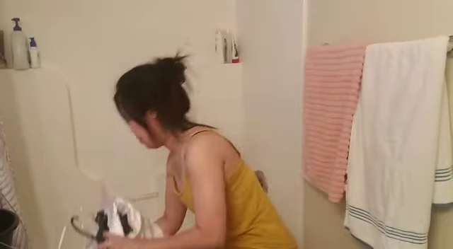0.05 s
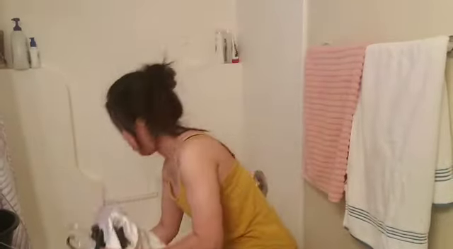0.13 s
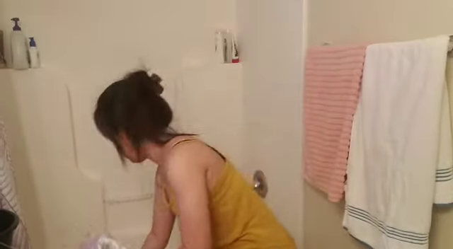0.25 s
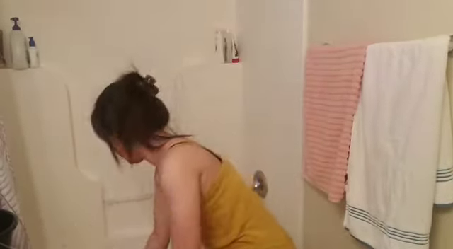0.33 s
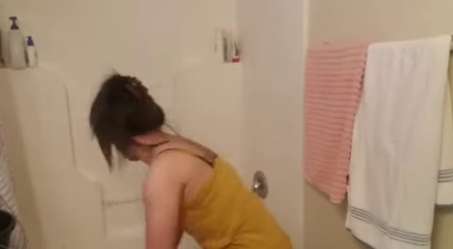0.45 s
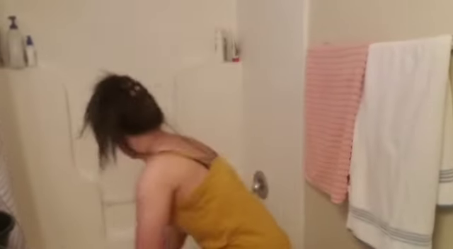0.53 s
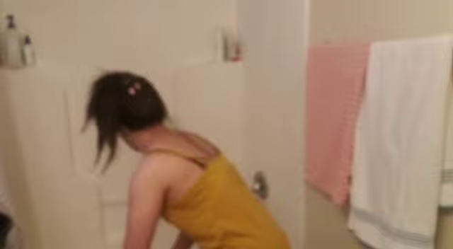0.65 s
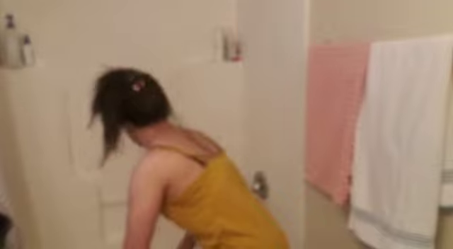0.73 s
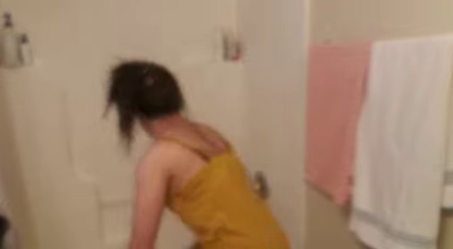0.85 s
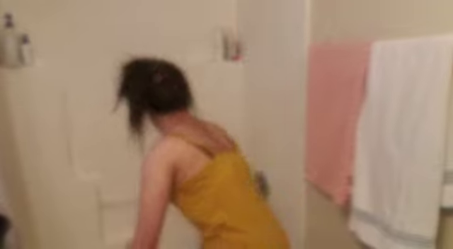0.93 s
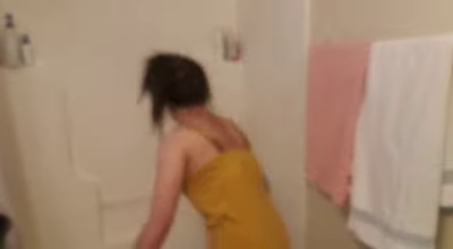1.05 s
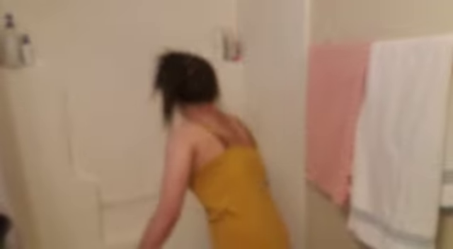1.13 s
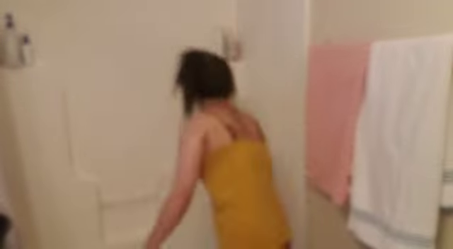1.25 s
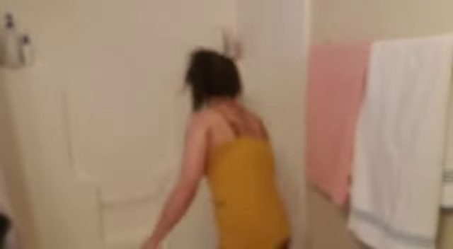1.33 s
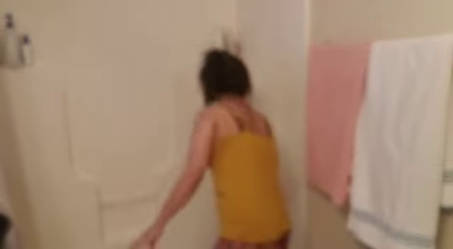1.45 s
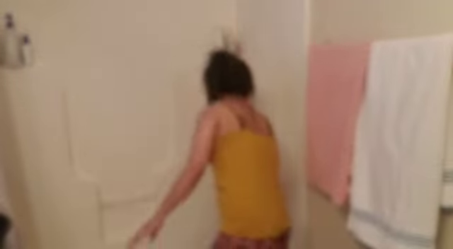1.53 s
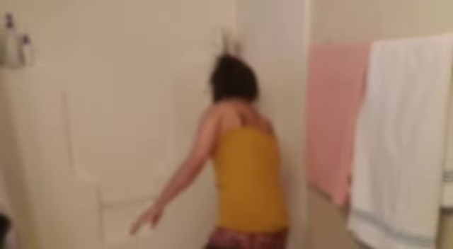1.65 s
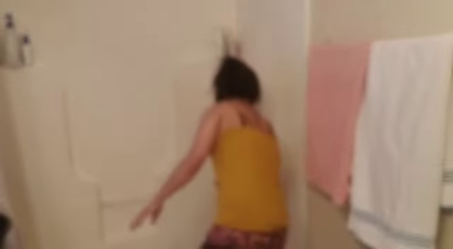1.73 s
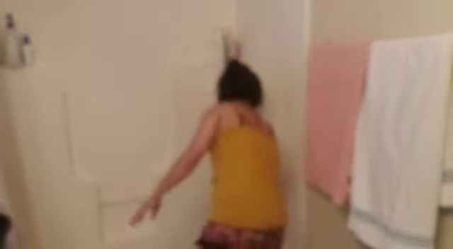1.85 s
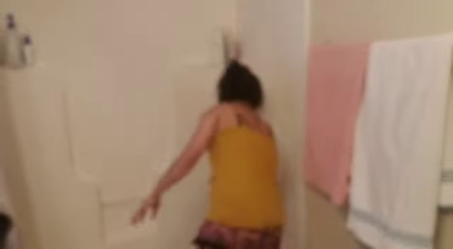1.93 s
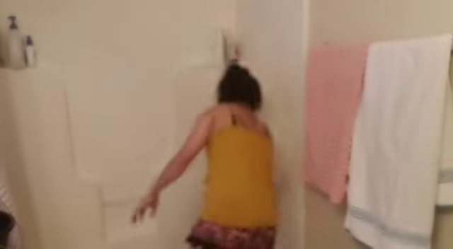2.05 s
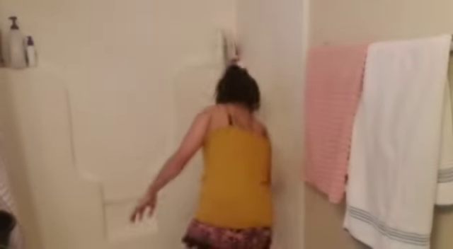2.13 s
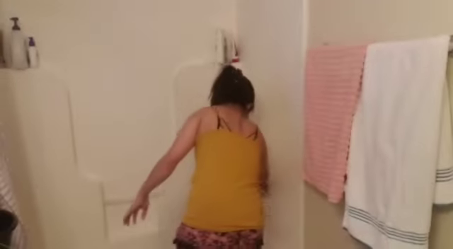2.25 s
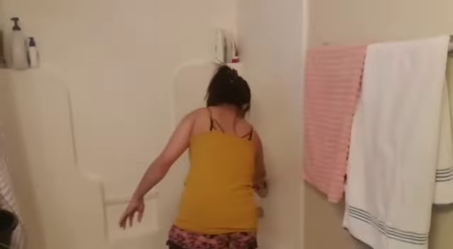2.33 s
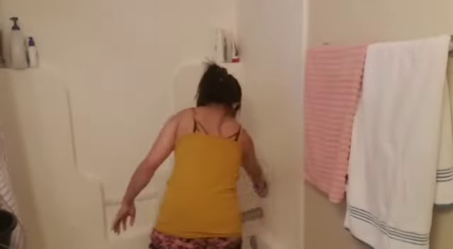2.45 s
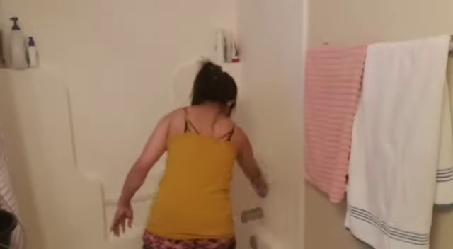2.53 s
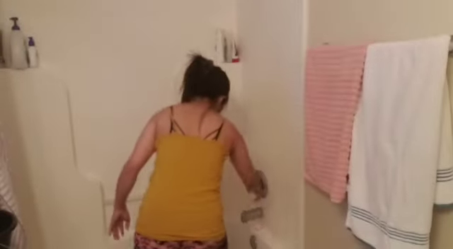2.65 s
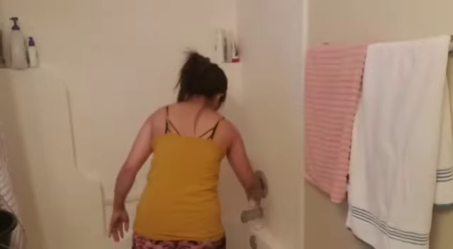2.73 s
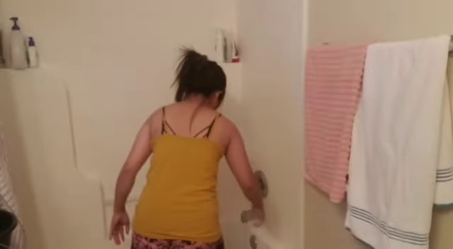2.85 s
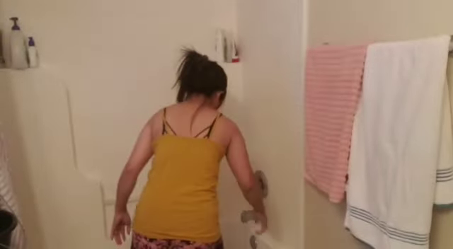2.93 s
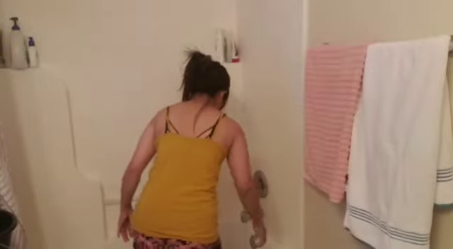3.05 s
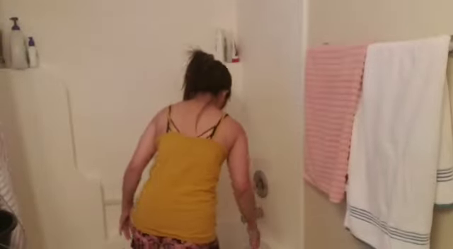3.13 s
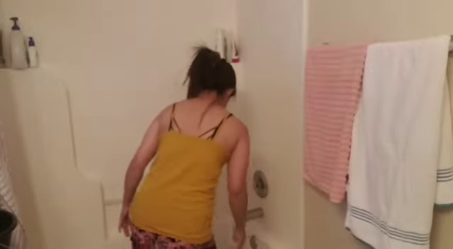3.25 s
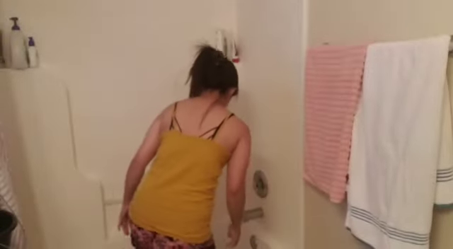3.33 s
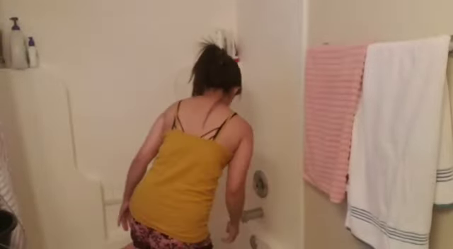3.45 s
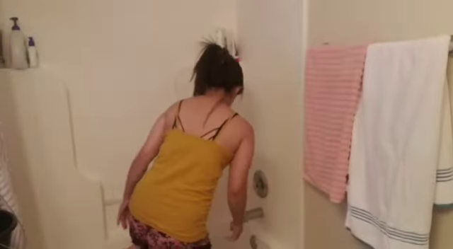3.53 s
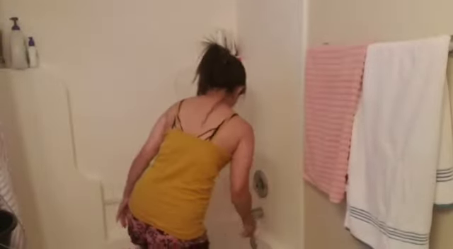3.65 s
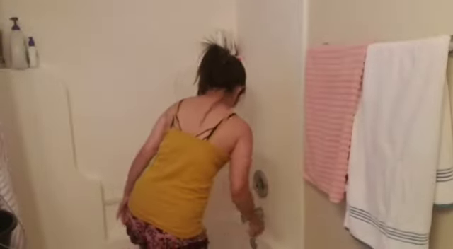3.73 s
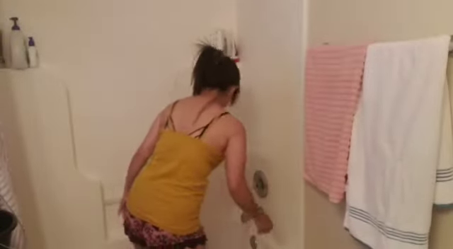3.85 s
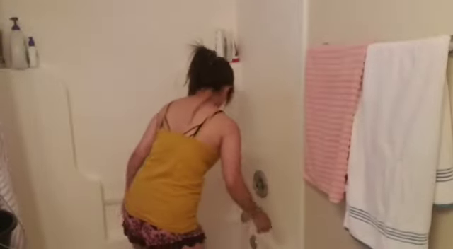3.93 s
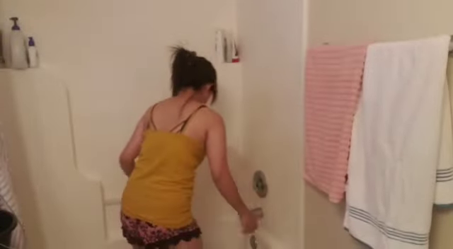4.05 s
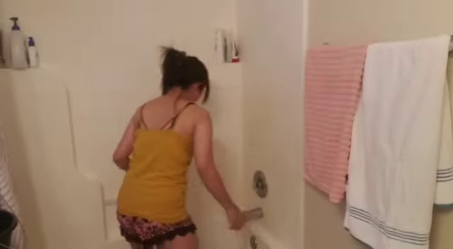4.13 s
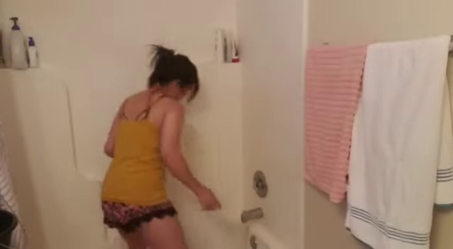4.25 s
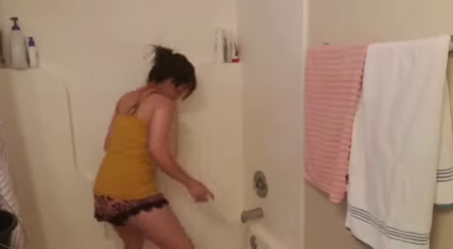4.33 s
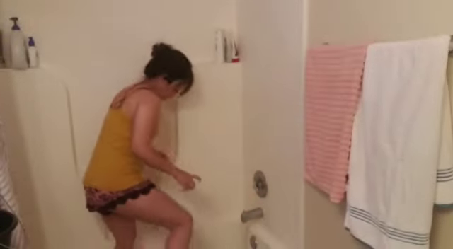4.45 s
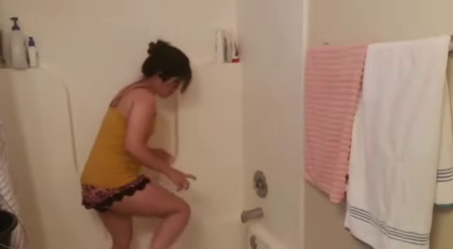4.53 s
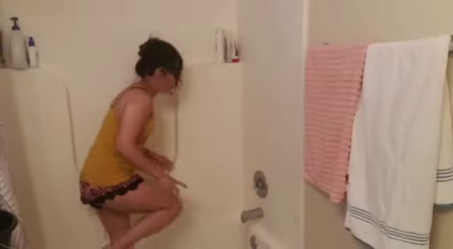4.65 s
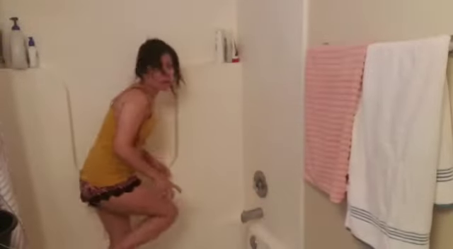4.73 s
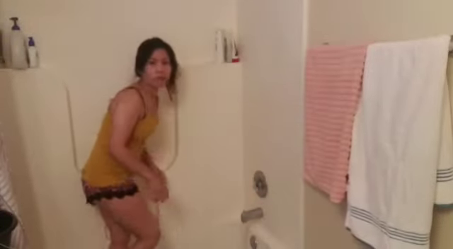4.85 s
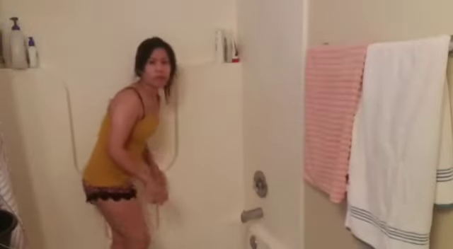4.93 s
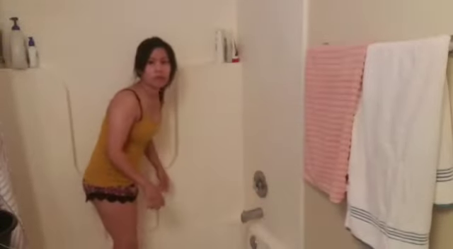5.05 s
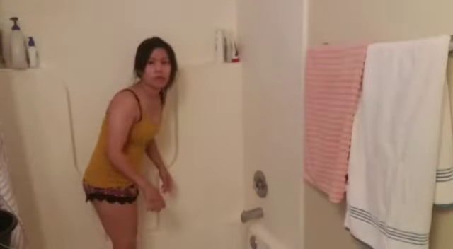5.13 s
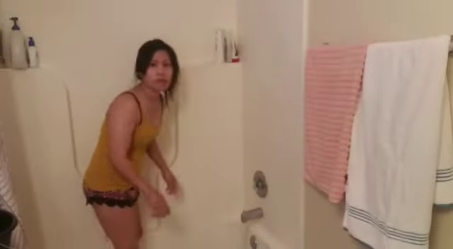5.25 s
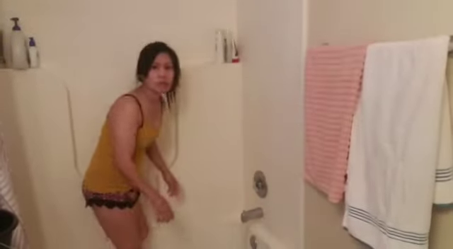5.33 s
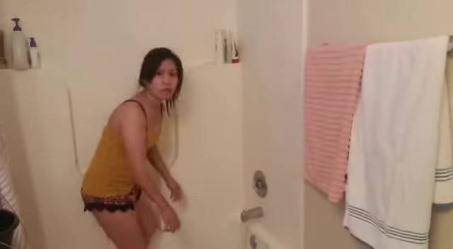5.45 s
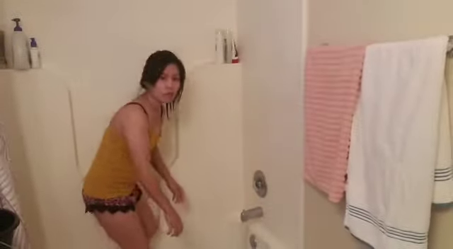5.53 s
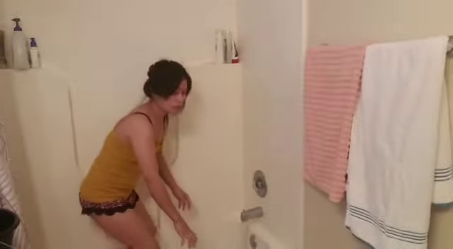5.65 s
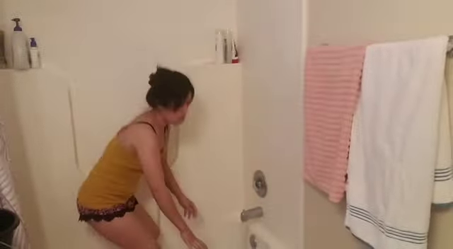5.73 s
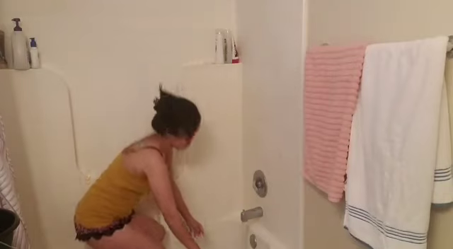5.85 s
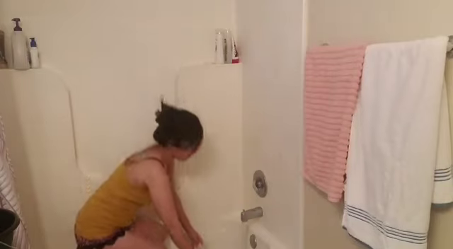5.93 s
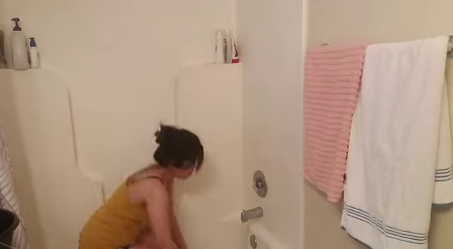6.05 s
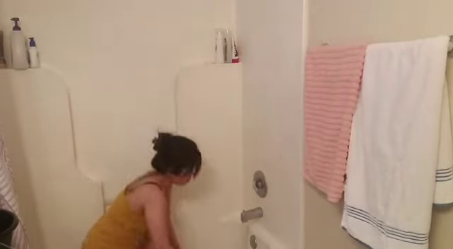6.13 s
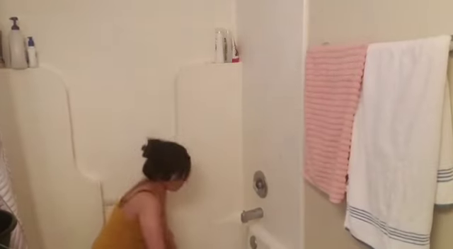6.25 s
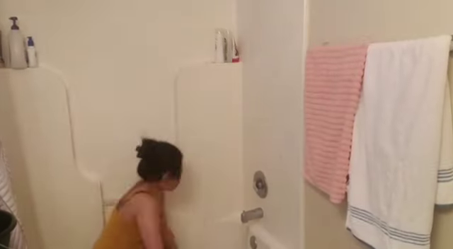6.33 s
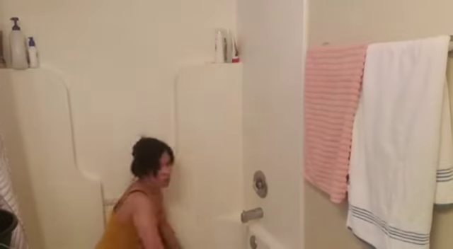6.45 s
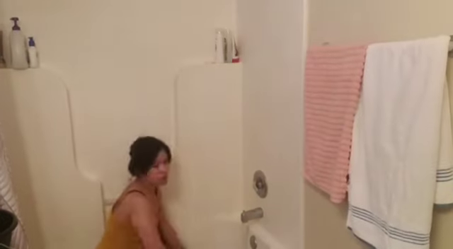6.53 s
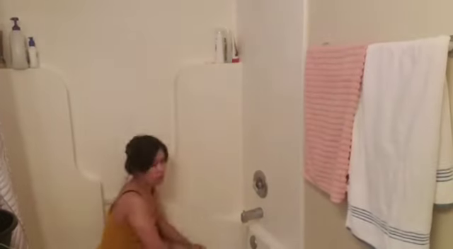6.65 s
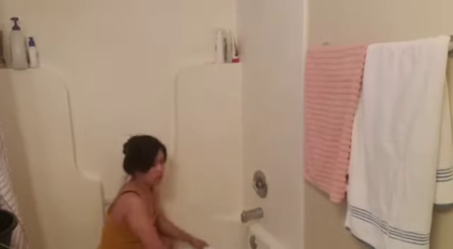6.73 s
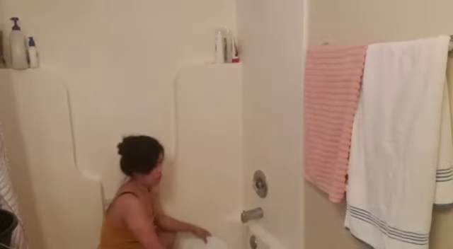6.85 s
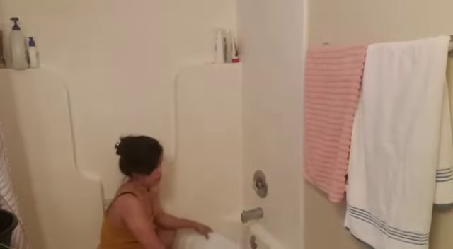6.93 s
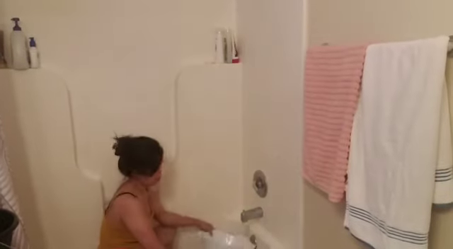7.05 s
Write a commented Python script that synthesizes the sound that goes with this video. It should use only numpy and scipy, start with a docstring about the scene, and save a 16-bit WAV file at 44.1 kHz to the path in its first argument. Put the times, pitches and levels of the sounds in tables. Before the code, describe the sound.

In a small hard-walled bathroom, a plastic-sounding hanger rattles, feet thump softly, and a tap coughs before pouring a bright, continuous stream.

```python
"""A bathroom: a fan hums (wavering tones over noise), cloth brushes the tub (shaped grains), a hanger
clatters onto its rim (clicks and rattles driving modes), and feet thump its floor (decaying low tones).
The tap squeals and coughs air in spurts, then a steady jet of noise patches and bubbles splashes in
and makes the tub's shell drum. Hard walls answer as decaying diffuse noise.
The two microphone ports hear the treble differently."""
import sys
import numpy as np
from scipy import signal
from scipy.fft import rfft, irfft, next_fast_len
from scipy.io import wavfile
from scipy.ndimage import uniform_filter1d, map_coordinates

SR = 44100
rng = np.random.default_rng(int(sys.argv[2]) if len(sys.argv) > 2 else 0)


def transcribe(u):
    """Save the signal u as a 16-bit wav file named by the first command-line argument.

    u: samples, shape (n,) or (channels, n), limited to [-1, 1]; the rate is SR.
    q: integer samples, one column per channel.
    """
    v = np.clip(np.atleast_2d(u).T, -1, 1)
    q = np.round(v * 32767).astype(np.int16)
    wavfile.write(sys.argv[1], SR, q)


N = 313110

# Levels are relative; each source adds its own gain.
# Fan hum. Each row: frequency in Hz, level in dB.
FAN_TONES = [(58.5, -51), (236.9, -69)]
# Spectrum of the fan's rumble. Each row: frequency in Hz, relative density in dB.
RUMBLE_SPECTRUM = [(15, -43), (30, -4), (45, -7.5), (80, -15), (110, 3), (135, -7), (240, -10),
                   (290, -13.5), (600, -19.5), (1000, -25), (1250, -39), (2000, -58), (3300, -120)]
# Brushes of cloth and skin. Each row: time of the peak in seconds, level in dB, rise and fall in dB per second.
BRUSHES = [(0.122, -63, 20, 100), (0.442, -43.5, 350, 3000), (0.7, -63, 299, 50), (0.723, -44, 1500.5, 154),
           (0.76, -44, 302, 401), (0.8, -69, 300, 202), (1.06, -72.5, 300, 37), (1.43, -70, 82.5, 600),
           (1.885, -66, 1500, 130)]
# Spectrum of the brushing. Each row: frequency in Hz, relative density in dB.
CLOTH_SPECTRUM = [(210, -36.5), (350, -7), (802, -9), (881, -2), (1110, -10.5), (1240, -7), (2110, -7.5),
                  (2590, -11), (4410, -8), (14700, -20.5)]
# Hanger contacts. Each row: start in seconds, click level in dB, rattle level in dB, rattle rise in seconds,
# rattle 60 dB decay in seconds, ringing level in dB, dullness in dB per octave, bass corner in Hz.
CONTACTS = [(0.1653, -35.5, -36.5, .002, 0.58, -20, 6.5, 2200),
            (0.2302, -25.5, -29, 0.0022, 0.25, -7.5, 2, 2600), (0.4515, -10, -18, 0.007, 0.26, 0, 1, 250)]
# Hanger modes. Each row: frequency in Hz, level in dB, nominal decay in seconds.
HANGER_MODES = [(351, 2, 1.5), (820, -8, 0.48), (1366, -4, 0.61), (1553, 1, 0.22), (1614, -5, .16),
                (1710, 4.5, 0.2), (2660, -9.5, 0.15), (3270, -21, 0.121), (3410, -9.5, 0.081),
                (4400, -8, 0.05), (5700, -18, 0.32), (6400, -5.5, 0.34), (7920, -10, 0.14),
                (9300, -30, 0.22), (9900, -19, 0.2), (12000, -11, 0.12)]
# Spectrum of a contact. Each row: frequency in Hz, relative level in dB.
CONTACT_SPECTRUM = [(150, -43.5), (250, 3.5), (340, -11), (1060, -13), (1750, -13), (2030, -14),
                    (3340, -7.5), (14700, -9)]
# Thumps on the tub and in the pipe. Each row: start in seconds, level in dB, frequency in Hz,
# 60 dB decay in seconds.
THUMPS = [(0.367, -44, 300, 0.18), (0.387, -42, 245, 0.11), (0.39, -40.5, 107.4, 0.25),
          (2.052, -41.5, 156, 0.39), (2.081, -33.5, 113.4, 0.17), (2.309, -40.5, 112.8, 0.45),
          (2.65, -36, 201, .13), (3.034, -37, 45, 0.14), (4.313, -30, 50.3, 0.36), (5.599, -46, 409, 0.77),
          (6.127, -30.5, 62.3, .16), (6.23, -38, 166, 0.094), (6.41, -34.5, 136, .18)]
# Faint narrow chirrs before the stream. Each row: start in seconds, level in dB, centre in Hz,
# time to the peak in seconds, width as a share of the centre.
CHIRRS = [(1.05, -55, 3560, .015, 0.11), (1.05, -55, 7660, .015, 0.076), (1.875, -50, 3600, 0.024, 0.12),
          (1.885, -63, 5000, 0.028, 0.11), (2.165, -45, 1140, 0.015, 0.12), (2.376, -33, 1800, 0.009, .3)]
# Jerks of the opening tap. Each row: start in seconds, rise in seconds, spray level in dB, fizz level in dB,
# spray sag and fizz sag in dB per second.
SPURTS = [(2.045, 0.0055, -50.5, -53.5, 167, 200), (2.12, 0.032, -56.5, -62, 62, 60),
          (2.264, 0.0125, -47.5, -46.5, 40, 103), (2.463, 0.04, -35.5, -42.5, 30, 13),
          (2.728, .012, -32, -37, 102, 61), (2.775, .014, -30.5, -34, 0, 0)]
SHUT_DB = -73.5  # level from which the first spurt rises
# Wavering of the full stream. Each row: time in seconds, spray level in dB.
STREAM = [(2.82, -34.5), (2.84, -29), (3.13, -33), (3.16, -29.5), (3.28, -33.5), (3.39, -30), (3.9, -32.5),
          (3.95, -29), (4.12, -32), (4.14, -28), (4.18, -32.5), (4.75, -31.5), (4.8, -26.5), (4.83, -30),
          (4.91, -27.5), (4.94, -33.5), (5.2, -26), (5.24, -31), (5.25, -28), (5.39, -33.5), (5.44, -28.5),
          (5.58, -33.5), (5.67, -29.5), (5.87, -31.5), (6.36, -29), (6.44, -34.5), (6.46, -30.5),
          (7.1, -31)]
FIZZ_DB, FIZZ_FOLLOWS = -35, 0.3  # mean of the full stream's listed fizz levels; share of the spray's swings
# Spits of fine spray. Each row: time of the peak in seconds, lift of the fizz in dB,
# distance in seconds at which the lift is 1/e.
SPITS = [(2.874, 2.5, .04), (3.18, 2.5, .03), (3.833, 6, 0.027), (4.585, 3.5, .025), (4.819, 1, .025),
         (4.9, 1, .02), (5.156, 3.5, .05), (5.64, 1.5, .04), (6.211, 2, 0.024), (6.849, 3, .04)]
# Pool and shell under the jet. Each row: time in seconds, gurgle level in dB, drumming level in dB.
POOL = [(2.03, -89, -68), (2.062, -56, -44), (2.134, -75, -62), (2.41, -45.5, -50), (2.454, -47.5, -48),
        (2.506, -36.5, -45), (2.6, -42, -45), (3.2, -41, -47), (3.33, -40, -44), (3.6, -41.5, -43.5),
        (4.05, -42, -44.5), (4.2, -40, -44.5), (4.45, -40, -44.5), (5.05, -40, -44.5), (5.5, -41, -44),
        (6.4, -41.5, -43.5), (6.9, -38.5, -42), (7.1, -40, -44.5)]
GURGLE_SWING_DB, DRUM_SWING_DB = 1, 1  # size of the slow chance swells
# Spectra of spray, fine fizz, gurgling and drumming. Each row: frequency in Hz, relative density in dB.
SPRAY_SPECTRUM = [(1060, -39.5), (1800, -12.5), (2870, -5), (3230, -4), (3770, -4.5), (4150, 0.5),
                  (7500, -7), (9750, -37.5), (16500, -120)]
FIZZ_SPECTRUM = [(3820, -18), (6500, -7), (7820, -3.5), (8720, -6.5), (9690, -5), (11000, -8.5),
                 (12100, -5.5), (14000, -7), (14700, -14.5)]
GURGLE_SPECTRUM = [(320, -31), (550, -7.5), (648, -9.5), (709, -2), (985, -3), (1350, 3), (1750, 1),
                   (2500, -5.5), (3250, -28.5), (5500, -120)]
DRUM_SPECTRUM = [(44, -30.5), (75, -4.5), (194, -0.5), (360, -6), (406, -5.5), (449, -8.5), (680, -9),
                 (880, -40.5), (1500, -120)]
# Lumps of water slapping the pool. Each row: start in seconds, level in dB, centre in Hz,
# time to the peak in seconds, width as a share of the centre.
SLAPS = [(2.869, -28, 4370, 0.016, 0.23), (3.40, -19, 4300, .012, 0.15), (3.479, -16.5, 3800, 0.011, 0.067),
         (3.689, -15, 4140, 0.01, .15), (3.951, -18.5, 3800, 0.018, 0.13), (4.069, -17, 4280, .012, .15),
         (4.128, -12, 3600, 0.0085, 0.1), (4.378, -16.5, 2430, 0.013, 0.18),
         (4.378, -19, 3320, 0.012, 0.051), (4.485, -13.5, 4340, 0.0046, 0.086),
         (4.595, -19.5, 7560, 0.007, .08), (4.645, -20, 4260, 0.0061, 0.052),
         (4.765, -12.5, 6200, 0.008, 0.093), (4.795, -19, 5230, 0.0099, 0.27),
         (4.895, -18, 4760, 0.011, 0.23), (5.005, -17, 2240, 0.01, 0.068), (5.179, -16, 4060, 0.01, .15),
         (5.25, -13, 4530, 0.0078, 0.18), (5.283, -10.5, 5040, 0.0073, 0.18),
         (5.63, -16, 3500, 0.0039, 0.42), (5.91, -16, 4120, 0.0052, 0.31), (6.285, -16, 4370, .01, .2),
         (6.365, -12, 6540, 0.016, 0.17), (6.565, -14.5, 5300, 0.017, 0.17)]
# Resonances of shell and alcove. Each row: frequency in Hz, width in Hz, left lift in dB, right lift in dB.
SHELL_MODES = [(110.5, 7, 5.5, 4.5), (203.6, 3.9, 4.5, 10.5), (261, 13, -2, 5), (304, 13, 1.5, 4),
               (412.5, 6.3, 10, 10), (729, 31, 5.5, 5), (1204, 50, 2.5, 3), (1370, 13, 3.5, 0),
               (2410, 34, 1.5, -2), (2710, 30, 3, 6), (3289, 26.5, 8, 1.5), (3520, 320, 2.5, 2.5),
               (3810, 36, -10, 11.5), (4190, 50, 2.5, 7), (3880, 80, 1, -13), (4317, 36, -13, 9.5),
               (5090, 60, -12, 6)]
# Squeals of the tap valve. Each row: start in seconds, level in dB, frequency in Hz, length in seconds.
SQUEALS = [(2.379, -37.5, 2450, 0.026), (2.41, -48, 2560, .022)]
# Diffuse field. Each row: frequency in Hz, left-right likeness from 0 to 1.
LIKENESS = [(60, 0.65), (270, 0.98), (440, 0.44), (730, 0.17), (1200, 0.03), (15000, 0.049)]
# Reverberation at damping 1. Each row: frequency in Hz, 60 dB decay in seconds.
WALL_DECAY = [(200, 0.82), (1500, 0.58), (5000, .65), (12000, 0.22)]
# Port colour. Each row: frequency in Hz, left over right in dB.
PORT_BALANCE = [(60, 1), (200, -1), (500, -0.5), (2000, 1.5), (3000, 2.5), (4200, 9.5), (5000, 1.5),
                (6200, 3), (7700, -10.5), (8600, 0.5), (9600, -0.5), (11000, 2), (11900, -18.5),
                (12500, -28), (13000, -37), (13600, -49)]
LAG_S, TOP_HZ = 4 / 44100, 14650  # delay of the left port; upper band limit
# Spectrum of the self-noise. Each row: frequency in Hz, relative density in dB.
HISS_SPECTRUM = [(650, -30.5), (1100, -2.5), (2000, -4), (2900, -5.5), (3600, -1), (4600, -7), (6500, -3.5),
                 (7600, -3), (8600, -5), (14700, -8.5)]


def amp(db):
    """Level is logarithmic: decibels to gain."""
    return 10 ** (np.asarray(db) / 20)


def unit(x):
    """Mean power sets level: a signal is scaled to rms 1."""
    return x / np.sqrt(np.mean(x ** 2) + 1e-20)


def along(points, hz):
    """Spectra are drawn over log frequency: (Hz, value) points are joined by lines."""
    f, v = np.transpose(points)
    return np.interp(np.log(hz + 1), np.log(f + 1), v)


def curves(rows):
    """An envelope is linear in dB between points: one curve per column after time, near silence before."""
    seconds, *columns = np.transpose(rows)
    return [np.interp(np.arange(N) / SR, seconds, c, left=-120) for c in columns]


def wobble(rate):
    """Slow chance variation is a smooth curve through random knots, rate of them a second."""
    knots = rng.standard_normal(int(N * rate / SR) + 4)
    return map_coordinates(knots, [np.arange(N) * rate / SR])


def filtered(x, response):
    """Linear filtering multiplies the spectrum by a response of frequency."""
    m = next_fast_len(N + 8192)
    return irfft(rfft(x, m) * response(np.fft.rfftfreq(m, 1 / SR)), m)[..., :N]


def resonance(hz, centre, width):
    """A damped oscillator responds in a band: gain 1 at its centre in Hz, width in Hz."""
    return 1j * hz * width / (centre * centre - hz * hz + 1j * hz * width)


def coloured(pair, spectrum):
    """A diffuse field is partly coherent: two noises become mid and side by likeness, mid at rms 1."""
    def mid_side(hz):
        turn = np.arccos(np.clip(along(LIKENESS, hz), -1, 1)) / 2
        return amp(along(spectrum, hz)) * [np.cos(turn), np.sin(turn)]
    mid, side = filtered(pair, mid_side)
    return np.array([mid + side, mid - side]) / np.std(mid)


def patchy(patchy_db):
    """Turbulence is intermittent: two noises share time-frequency patches of random gain."""
    z = signal.stft(rng.standard_normal((2, N)), nperseg=512)[2]
    field = rng.standard_normal(z.shape[1:])
    field = uniform_filter1d(uniform_filter1d(field, 8, 0), 5, 1)
    return signal.istft(z * amp(patchy_db * unit(field)), nperseg=512)[1][:, :N]


def droplets(count, low_hz, high_hz, turns, spread_db):
    """Small bubbles ring as damped tones of rising pitch, scattered in time and place (mid, side)."""
    at, pitch, size, place = rng.random((count, 4)).T
    hz, t = low_hz * (high_hz / low_hz) ** pitch[:, None], np.arange(200) / SR
    # the envelope falls by 1/e in this many turns of the starting pitch
    decay = hz * t / turns
    grain = np.sin(2 * np.pi * hz * t * (1 + 0.12 * decay)) * np.exp(-decay)
    grain *= amp(-spread_db * np.log(size + 0.021))[:, None] * np.sqrt(hz)
    where = ((at * N).astype(int)[:, None] + np.arange(200)).ravel()
    sides = np.cos(1.4 * (place - 0.5)), np.sin(3.3 * (place - 0.5))
    return unit(np.array([np.bincount(where, (grain * s[:, None]).ravel(), N + 200)[:N] for s in sides]))


def puffs(table):
    """A brief burst is band-passed noise under a smooth rise and decay."""
    out, t = np.zeros((2, N + SR)), np.arange(SR // 5) / SR
    for start, db, hz, length, width in table:
        b, a = signal.butter(2, [hz / (1 + width), hz * (1 + width)], "band", fs=SR)
        noise = unit(signal.lfilter(b, a, rng.standard_normal((2, len(t)))))
        swell = (t / length * np.exp(1 - t / length)) ** 2
        out[:, round(start * SR):][:, :len(t)] += amp(db - 12) * noise * swell
    return out[:, :N]


def walls(x, damping=1):
    """Reverberation is a diffuse noise tail, each frequency dying at its own speed, divided by damping."""
    hz, t, z = signal.stft(rng.standard_normal((2, SR)), SR, nperseg=256)
    turn = np.arccos(np.clip(along(LIKENESS, hz), -1, 1))[:, None] / 2
    mid, side = z[0] * np.cos(turn), z[1] * np.sin(turn)
    decay = amp(-60 * damping * t / along(WALL_DECAY, hz)[:, None])
    tail = signal.istft(np.array([mid + side, mid - side]) * decay, SR, nperseg=256)[1]
    tail = tail / np.linalg.norm(tail[0])
    return signal.fftconvolve(x * np.ones((2, 1)), tail, axes=1)[:, :x.shape[-1]]


def fan():
    """Periodic flow gives tones and turbulence gives noise: a firm wavering hum over a low rumble."""
    t, hum = np.arange(N) / SR, 0
    for hz, db in FAN_TONES:
        level = amp(db + 2.5 + 2.4 * wobble(7.3))
        hum = hum + level * np.sin(2 * np.pi * hz * t + hz / 110 * wobble(5.5))
    return hum + amp(-56) * coloured(patchy(patchy_db=0.5), RUMBLE_SPECTRUM)


def rustle():
    """Friction is a crowd of tiny slips: cloth and skin brush the tub as grains over patchy noise."""
    grains = droplets(count=6000, low_hz=2000, high_hz=12000, turns=1.2, spread_db=3.5)
    grains = patchy(patchy_db=2.5) + 0.5 * grains
    t = np.arange(N) / SR
    level = sum(amp(db + np.minimum(rise * (t - s), fall * (s - t))) for s, db, rise, fall in BRUSHES)
    brush = level * coloured(grains, CLOTH_SPECTRUM)
    return 0.73 * brush + amp(-21.5) * walls(brush)


def hanger():
    """Impact excites modes: each contact clicks and rattles, driving the hanger's modes at new strengths."""
    out, t = np.zeros((2, N + SR)), np.arange(SR) / SR
    for start, click_db, rattle_db, rise, t60, ring_db, dull_db, low_hz in CONTACTS:
        grit = rng.standard_normal((2, SR))
        tones = np.cos(2 * np.pi * 4400 * t) + 0.7 * np.cos(2 * np.pi * 8200 * t)
        click = amp(click_db + 13 - 60 * t / 0.007) * (tones + 0.3 * grit)
        rattle = grit * amp(rattle_db + 6.5 - 60 * t / t60) * (1 - np.exp(-(t / rise) ** 2))
        strength_db = rng.normal(0, 1.5, len(HANGER_MODES))

        def response(hz):
            ring = 0
            for k, (centre, db, life) in enumerate(HANGER_MODES):
                level = (-1) ** k * amp(db + 15.5 + ring_db + strength_db[k])
                # a mode's width follows from its decay; loose contact widens it
                ring = ring + level * resonance(hz, centre, 16 / life)
            # a light contact moves no large surface, so it lacks bass
            light = (1j * hz / (low_hz + 1j * hz)) ** 2
            tilt_db = 4 - dull_db * np.log2(hz / 4000 + 0.051)
            return amp(along(CONTACT_SPECTRUM, hz) + tilt_db) * (1 + ring) * light

        blow = filtered(click + rattle, response)[:, :SR]
        out[:, round(start * SR):][:, :SR] += blow + amp(-18.5) * walls(blow)
    return out[:, :N]


def thumps():
    """A soft blow excites mainly low modes: a decaying low tone with a puff of dull noise."""
    out, t = np.zeros(N + SR), np.arange(SR // 2) / SR
    for start, db, hz, t60 in THUMPS:
        band = signal.butter(3, [hz * 0.7, hz * 1.9], "band", fs=SR, output="sos")
        puff = unit(signal.sosfilt(band, rng.standard_normal(len(t))))
        swell = (1 - np.exp(-t / 0.0018)) * amp(-60 * t / t60)
        blow = np.sin(2 * np.pi * hz * t) + 0.45 * puff
        out[round(start * SR):][:len(t)] += amp(db + 3) * swell * blow
    return out[:N] + amp(-12) * walls(out[:N], damping=1.5)


def chirrs():
    """Narrow-band noise has a pitch: faint short chirrs come before the stream."""
    return puffs(CHIRRS)


def flow():
    """Loudness follows the flow: spray and fizz levels jump and sag in spurts, then waver in full stream."""
    rows, t = [(SPURTS[0][0], SHUT_DB, SHUT_DB)], np.arange(N) / SR
    for (start, rise, spray, fizz, spray_sag, fizz_sag), (end, *_) in zip(SPURTS, SPURTS[1:]):
        sagging = end - start - rise
        rows += [(start + rise, spray, fizz), (end, spray - spray_sag * sagging, fizz - fizz_sag * sagging)]
    start, rise, spray, fizz, *_ = SPURTS[-1]
    rows += [(start + rise, spray, fizz)]
    usual = np.mean([db for _, db in STREAM])
    rows += [(at, db, FIZZ_DB + FIZZ_FOLLOWS * (db - usual)) for at, db in STREAM]
    spray_db, fizz_db = curves(rows)
    spits_db = sum(db * np.exp(-((t - at) / length) ** 2) for at, db, length in SPITS)
    return spray_db, fizz_db + spits_db


def jet():
    """Bubbles ring and broken water rushes; the shell, driven by the stream, drums and resonates."""
    spray_db, fizz_db = flow()
    gurgle_db, drum_db = curves(POOL)
    flutter = wobble(25)
    drops = droplets(count=14000, low_hz=1468, high_hz=9740, turns=4, spread_db=4.5)
    drops = patchy(patchy_db=2.0) + 0.5 * drops
    fine = droplets(count=12000, low_hz=5760, high_hz=15000, turns=1.55, spread_db=2.5)
    fine = patchy(patchy_db=2.14) + 0.3 * fine
    bubbles = droplets(count=5000, low_hz=694, high_hz=2400, turns=2.3, spread_db=0.5)
    bubbles = patchy(patchy_db=2.5) + 0.21 * bubbles

    fizz_db = fizz_db + 0.39 * flutter + 0.4 * wobble(40)
    gurgle_db = gurgle_db + GURGLE_SWING_DB * wobble(6) + 0.37 * flutter
    water = amp(spray_db + 0.88 * flutter) * coloured(drops, SPRAY_SPECTRUM)
    water += amp(fizz_db) * coloured(fine, FIZZ_SPECTRUM)
    water += amp(gurgle_db) * coloured(bubbles, GURGLE_SPECTRUM)
    water += puffs(SLAPS)
    # part of the stream is heard only through the near reflections of the alcove
    water = 0.86 * water + 0.45 * walls(water.mean(0), damping=4)
    drum = amp(drum_db + DRUM_SWING_DB * wobble(8.2)) * coloured(patchy(patchy_db=1.5), DRUM_SPECTRUM)

    def shell(hz):
        return 1 + sum((amp([[left], [right]]) - 1) * resonance(hz, centre, width)
                       for centre, width, left, right in SHELL_MODES)
    return amp(-0.44) * filtered(water + drum, shell)


def valve():
    """Friction can sustain a tone: the tap's washer squeals briefly and roughly as it turns."""
    t, tone = np.arange(N) / SR, 0
    for start, db, hz, length in SQUEALS:
        rough = amp(db + 2.5 * wobble(150)) * np.sin(2 * np.pi * hz * t + 0.95 * wobble(220))
        onset = np.clip((t - start) / 0.002, 0, 1)
        tone = tone + rough * onset * np.clip(1 - (t - start) / length, 0, 1) ** 0.3
    return tone + amp(-13) * walls(tone, damping=2)


def scene():
    """Sound pressures superpose: all sources add at the microphone."""
    return fan() + rustle() + hanger() + thumps() + chirrs() + jet() + valve()


def record(dry):
    """Ports differ in colour and delay; faint self-noise, a soft ceiling and a band limit follow."""
    def ports(hz):
        ratio = amp(2 * along(PORT_BALANCE, hz))  # power, left over right
        colour = np.sqrt(2 * np.array([ratio, np.ones_like(hz)]) / (1 + ratio))
        # half the lag delays the left, half advances the right
        return colour * np.exp(-1j * np.pi * hz * LAG_S * np.array([[1], [-1]]))
    hiss = amp(-74.5) * coloured(rng.standard_normal((2, N)), HISS_SPECTRUM)
    heard = filtered(dry, ports) + hiss
    squeezed = heard / (1 + np.abs(heard / 0.7) ** 4) ** (1 / 4)
    return filtered(squeezed, lambda hz: hz < TOP_HZ)


dry = scene()
out = record(dry)
transcribe(out)
```